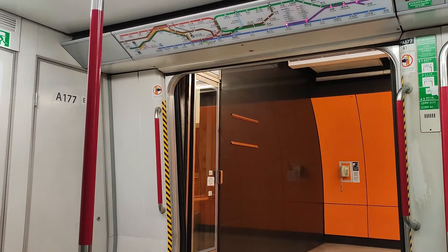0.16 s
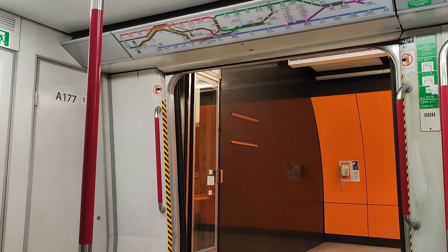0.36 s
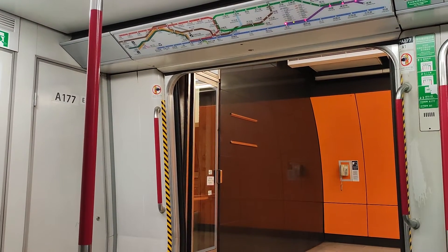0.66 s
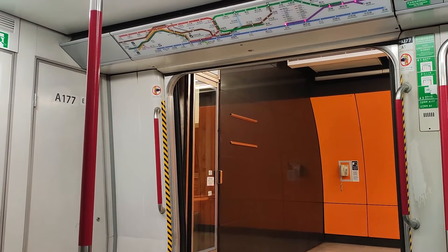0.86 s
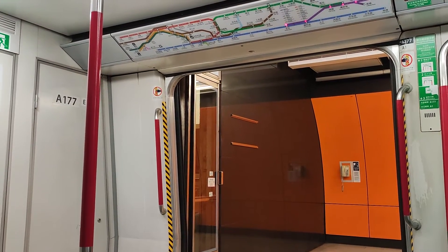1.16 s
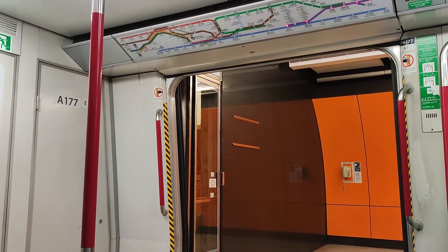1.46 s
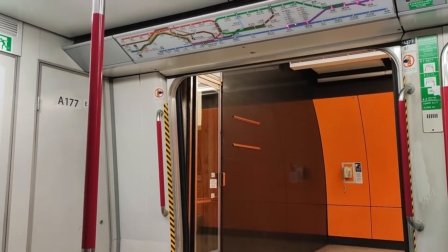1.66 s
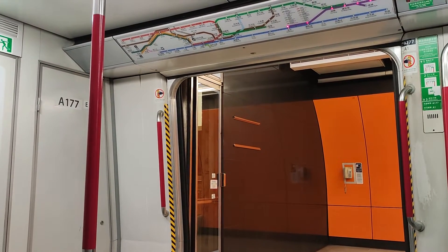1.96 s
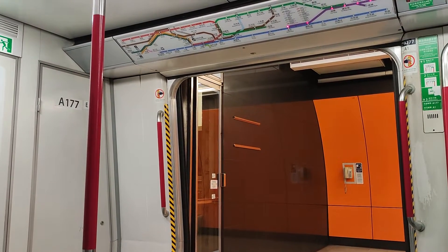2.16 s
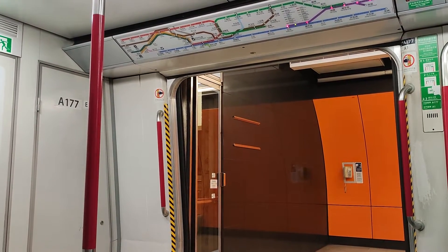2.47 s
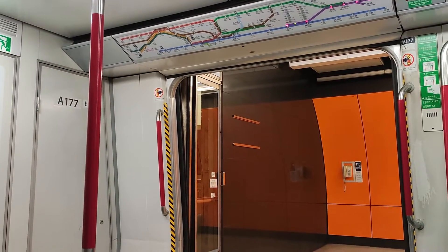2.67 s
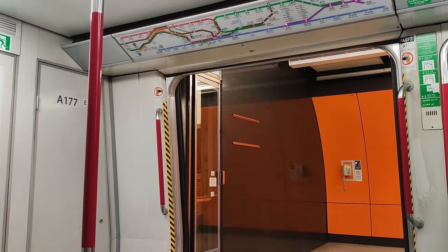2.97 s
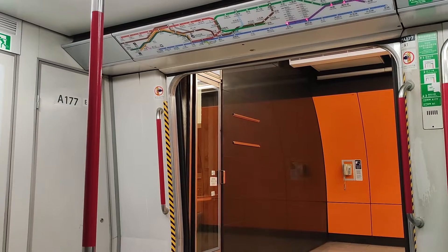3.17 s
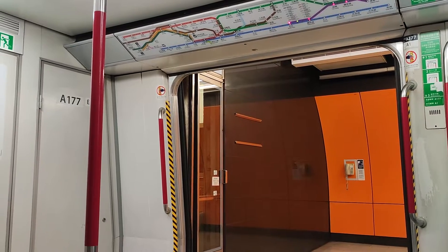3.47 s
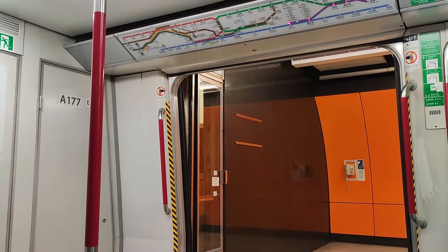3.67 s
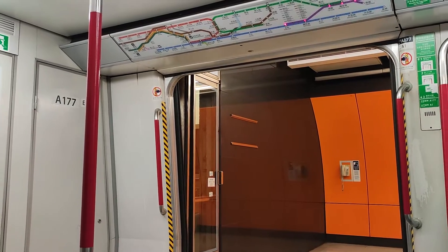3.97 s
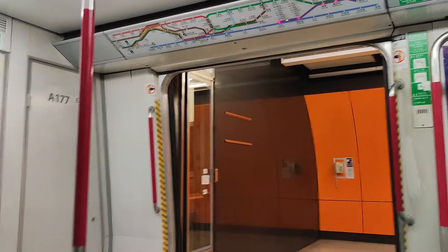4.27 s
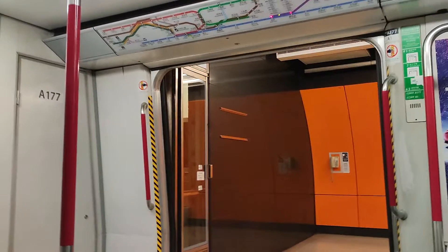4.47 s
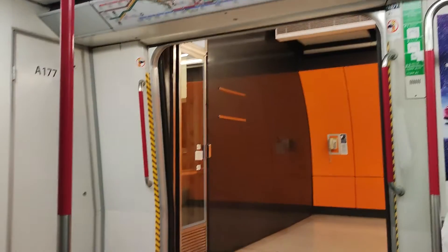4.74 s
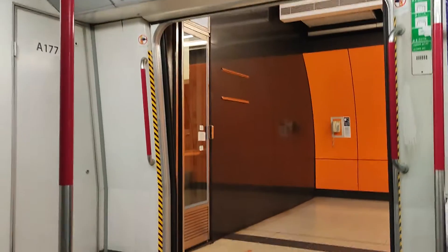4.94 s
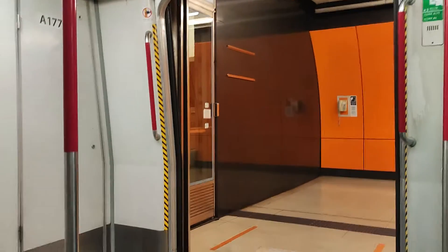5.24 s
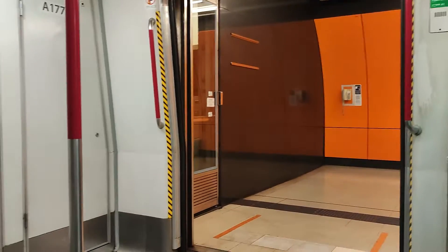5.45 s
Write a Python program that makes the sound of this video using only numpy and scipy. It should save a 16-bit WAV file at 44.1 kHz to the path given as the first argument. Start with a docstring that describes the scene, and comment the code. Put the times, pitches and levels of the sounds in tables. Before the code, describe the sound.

Machinery hums and air vents rush steadily inside a stationary metro carriage, the low hum swelling and easing, with a few faint finger ticks.

```python
"""Metro carriage, doors open

At a platform, a compressor turning 29.5 times a second hums through the body, its strongest orders
swelling and easing as they beat against a twin machine, over a duct rumble and the steady rush of
the air vents. Fingers tick, tap and rub on the hand-held camera, and as it turns the vent hiss
dulls and moves from the left towards the centre."""
import sys
import numpy as np
from scipy import signal
from scipy.fft import rfft, irfft, next_fast_len
from scipy.io import wavfile
from scipy.ndimage import uniform_filter1d, map_coordinates

SR = 44100
rng = np.random.default_rng(int(sys.argv[2]) if len(sys.argv) > 2 else 0)


def waveform_to_disk(signal):
    """Save audio, clipped to [-1, 1], as 16-bit WAV at the path in sys.argv[1]."""
    frames = np.transpose(np.atleast_2d(signal))
    scaled = np.clip(frames, -1, 1) * 32767
    samples = np.round(scaled).astype(np.int16)
    wavfile.write(sys.argv[1], SR, samples)


N = 247401
TIME = np.arange(N) / SR


def amp(db):
    """Decibels to gain."""
    return 10 ** (np.asarray(db) / 20)


def unit(x):
    """Scale to rms 1."""
    return x / np.sqrt(np.mean(x ** 2) + 1e-20)


def along(points, hz):
    """Read (frequency [Hz], value) points on a log axis."""
    freqs, values = np.transpose(points)
    return np.interp(np.log(hz + 1), np.log(freqs + 1), values)


def fader(points):
    """Gain at each sample from (time [s], level [dB]) points."""
    return amp(np.interp(TIME, *np.transpose(points)))


def wobble(rate):
    """A smooth random curve, rate knots a second."""
    knots = rng.standard_normal(int(N * rate / SR) + 4)
    return map_coordinates(knots, [TIME * rate])


def filtered(x, response):
    """Filter x by a gain given as a function of frequency."""
    size = next_fast_len(N + SR // 2)
    return irfft(rfft(x, size) * response(np.fft.rfftfreq(size, 1 / SR)), size)[..., :N]


def eq(x, curve):
    """Shape x with a (frequency [Hz], gain [dB]) curve."""
    return filtered(x, lambda hz: amp(along(curve, hz)))


def pan(lean_db):
    """Left and right gains from left minus right; the nearer side keeps full level."""
    return amp(np.minimum([[lean_db], [-lean_db]], 0))


def camera_turn(before, after, start_s=4.11, takes_s=0.57):
    """Crossfade from before to after as the camera turns."""
    done = np.clip((TIME - start_s) / takes_s, 0, 1)
    return (1 - done) * before + done * after


# Stereo image, tight bass and wide treble: (frequency [Hz], left-right likeness [0-1])
LIKENESS = [(60, 0.96), (200, 1), (380, 0.84), (700, 0.57), (1200, 0), (2400, 0)]

def width(hz):
    """Mid-side angle in radians: 0 is mono, pi / 4 fully diffuse."""
    return np.arccos(np.clip(along(LIKENESS, hz), -1, 1)) / 2


SHAFT_HZ = 29.5

def shaft_tone(shaft_angle, order, waver_db, swell=1):
    """One multiple of the shaft rate; higher ones waver more on their way through the carriage."""
    blur = .08 * np.sqrt(order) * wobble(4)
    phase = order * shaft_angle + rng.uniform(0, 2 * np.pi) + blur + np.angle(swell)
    side = np.where(order < 9, 1, rng.choice([-1, 1]))  # low orders lead on the left
    apart = side * width(order * SHAFT_HZ)
    waver = amp(waver_db * wobble(4.27))
    return np.abs(swell) * unit(waver * np.sin([phase + apart, phase - apart]))


# Fader rides for the sub throb, the deep drone and the burr: (time [s], level [dB])
THROB_RIDE = [(0, -22.5), (.22, -34), (.6, -21), (1.1, -30), (1.35, -24.5), (1.75, -38), (2.15, -22),
              (2.6, -31), (2.9, -25.5), (4.5, -27), (4.8, -35), (5.4, -27.5)]
DRONE_RIDE = [(0, -26), (.65, -23.5), (1, -29), (1.5, -23), (1.75, -27), (2.05, -21), (2.7, -28),
              (3.5, -26.5), (3.85, -26), (5.1, -29), (5.55, -24.5)]
BURR_RIDE = [(0, -38), (.7, -38), (1.3, -28), (1.9, -25), (2.6, -27), (3.4, -32.5), (3.85, -31), (4.6, -32),
             (5.25, -27.5), (5.61, -32)]
# The pulsing heart of the hum, sounded by both machines: (order [x shaft rate], level [dB],
# twin against it [dB], time of a lull [s], change with the camera's turn [dB])
BEATING_ORDERS = [(7, -25.3, -2, 1.28, 2), (8, -28.6, -17, 1.25, 0.5), (10, -33, -13, 0.7, -4),
                  (12, -39, -11, 1.9, 3.5), (14, -42.5, -5.5, 2.15, 5.5)]
# The even whine on top: (order [x shaft rate], left before trim [dB], right before trim [dB])
STEADY_ORDERS = [(6, -42, -42), (9, -44, -44), (11, -43, -48), (15, -41, -44.5), (17, -40.5, -38),
                 (19, -45, -44), (20, -39.5, -38), (21, -39, -40), (23, -41, -45.5), (24, -48, -42),
                 (25, -47, -42), (29, -37, -43.5), (35, -47, -40.5)]

def compressor(drift_hz=.015, slip_hz=0.0382, whine_trim_db=-0.3):
    """Hum of one shaft; a twin runs slip_hz faster, so order k beats at k times that rate."""
    angle = 2 * np.pi * np.cumsum(SHAFT_HZ + drift_hz * wobble(2.15)) / SR
    hum = fader(THROB_RIDE) * shaft_tone(angle, order=1, waver_db=1.2)
    hum += fader(DRONE_RIDE) * shaft_tone(angle, order=2, waver_db=0.5)
    hum += fader(BURR_RIDE) * shaft_tone(angle, order=5, waver_db=1.1)
    for order, db, twin_db, lull_s, turn_db in BEATING_ORDERS:
        slip_angle = 2 * np.pi * order * slip_hz * (TIME - lull_s)
        beat = 1 - amp(twin_db) * np.exp(1j * slip_angle)  # the two oppose each other at the lull
        hum += amp(db + camera_turn(0, turn_db)) * shaft_tone(angle, order, waver_db=0.5, swell=beat)
    whine = sum(amp([[left], [right]]) * shaft_tone(angle, order, waver_db=2)
                for order, left, right in STEADY_ORDERS)
    return hum + amp(whine_trim_db) * whine


# Balance of the moving air: (frequency [Hz], left minus right [dB])
AIR_LEAN = [(60, 0.5), (150, 0.5), (600, 0.3), (1300, 2.5), (2300, 2), (4400, -0.5), (6500, 3)]

def airflow(spectrum, eddy_db=0.55):
    """Turbulent stereo noise: eddies ripple its level in small patches of pitch and time."""
    bands = signal.stft(rng.standard_normal((2, N)), nperseg=512)[2]
    eddies = uniform_filter1d(rng.standard_normal(bands.shape[1:]), size=8, axis=0)
    eddies = uniform_filter1d(eddies, size=20, axis=1)
    bands *= amp(eddy_db * unit(eddies))
    noise = signal.istft(bands, nperseg=512)[1][:, :N] * np.sqrt(SR / 2)  # 0 dB per Hz
    mid_side_gains = lambda hz: amp(along(spectrum, hz)) * [np.cos(width(hz)), np.sin(width(hz))]
    mid, side = filtered(noise, mid_side_gains)
    stereo = np.array([mid + side, mid - side])
    return filtered(stereo, lambda hz: amp(np.outer([.5, -.5], along(AIR_LEAN, hz))))


# The air's low resonance in the carriage, before its fader: (frequency [Hz], density [dB per Hz])
BOOM_SPECTRUM = [(70, -71), (98, -47.5), (117, -35.5), (130, -43), (145, -56), (200, -116.5)]
# One swell, then a slow ease: (time [s], gain [dB])
BOOM_RIDE = [(0, -5.5), (1.1, 2.4), (2, -5), (2.8, -4.5), (5.61, -8.5)]

def carriage_boom():
    """The air in the carriage resonates in a narrow band near 117 Hz."""
    return fader(BOOM_RIDE) * airflow(BOOM_SPECTRUM)


# The vents' body, hissing top and fine fizz, before panning: (frequency [Hz], density [dB per Hz])
RUSH_SPECTRUM = [(150, -64), (330, -55.5), (460, -50.5), (550, -54), (750, -51), (920, -55.5), (1300, -54),
                 (2600, -62), (3700, -64.5), (4400, -69), (5000, -67.5), (5800, -72), (6900, -72),
                 (8800, -115)]
HISS_SPECTRUM = [(5800, -110), (6700, -79), (7400, -73), (8000, -69.5), (8450, -79.5), (8950, -100),
                 (9500, -125)]
FIZZ_SPECTRUM = [(8600, -115), (9300, -85), (10300, -85), (11500, -82.5), (13800, -83), (15000, -86),
                 (15600, -112)]
# The darker tone of the rush after the turn: (frequency [Hz], gain [dB])
TURNED_EQ = [(200, 10.5), (450, -0.5), (750, 0.7), (1500, -0.8), (3500, -1), (5000, -3), (6500, -5.5)]

def vents(shift_right_db=0.7):
    """Air rushes from the vents; the directional treble follows the camera's turn."""
    rush = airflow(RUSH_SPECTRUM)
    turned_rush = amp([[-shift_right_db], [shift_right_db]]) * eq(rush, TURNED_EQ)
    hiss = airflow(HISS_SPECTRUM) * camera_turn(amp([[0], [-28]]), amp([[-3.5], [-17]]))
    flutter = amp(.5 * wobble(7))
    fizz = flutter * airflow(FIZZ_SPECTRUM) * camera_turn(amp([[0], [-16.5]]), amp([[-6], [-4.5]]))
    return camera_turn(rush, turned_rush) + hiss + fizz


# The low bed under the vents: (frequency [Hz], density [dB per Hz])
RUMBLE_SPECTRUM = [(3, -68), (12, -47), (19, -46), (26, -48), (33, -58), (43, -46), (52, -55), (75, -47.5),
                   (120, -46.5), (160, -47), (190, -48), (235, -47), (330, -50), (500, -71), (1200, -100)]

def duct_rumble():
    """Air moving through the ducts rumbles steadily."""
    return airflow(RUMBLE_SPECTRUM)


# Finger cues on the case: (time [s], strength before EQ [dB], left minus right [dB],
# 60 dB decay [s], knock send [dB], low cut [Hz])
TICK_CUES = [(.037, -9, 24, .006, -18, 10500), (.046, -14, 24, .012, -17, 11000),
             (.0505, -3.5, 26, .007, -10, 6500), (4.183, -23, 12, .06, -12, 8000),
             (4.2048, -3, 26, .004, -5, 7300), (4.454, -12.5, -1, .018, -2, 7000),
             (4.457, -19, -5, .013, 12.5, 6000), (4.722, -5.5, -18, .004, -30, 10600)]
# A tick's dry top and its knock in the case: (frequency [Hz], gain [dB])
TICK_EQ = [(4000, -30), (6500, -9), (8000, 1), (10000, -5), (12000, -0.5), (15500, -0.5)]
KNOCK_EQ = [(1200, -18), (2500, 1), (3800, 5), (5100, 7), (7300, -1), (9000, -31)]

def finger_ticks():
    """The grip shifts: skin lets go with a snap, chatters briefly and knocks the camera's case."""
    ticks, knocks = np.zeros((2, 2, N))
    for start_s, db, lean_db, t60, knock_db, low_cut_hz in TICK_CUES:
        snap = np.arange(N) == round(start_s * SR)
        decay = (TIME >= start_s) * amp(-60 * np.maximum(TIME - start_s, 0) / t60)
        chatter = decay * rng.standard_normal((2, N))
        touch = amp(db) * pan(lean_db) * (snap + 0.46 * chatter)
        ticks += filtered(touch, lambda hz: 1 - 1 / (1 + (hz / low_cut_hz) ** 20))
        knocks += amp(knock_db) * touch
    return eq(ticks, TICK_EQ) + eq(knocks, KNOCK_EQ)


# The tap's dull, mid-heavy tone: (frequency [Hz], gain [dB])
TAP_EQ = [(150, -10), (400, 0), (900, 13), (1700, 16.5), (3000, 9.5), (4000, 1), (6000, -15), (9000, -50)]

def finger_tap(at_s=4.1981):
    """A fingertip lands on the right microphone port: one dull pulse with no ring."""
    push = np.arange(N) == round(at_s * SR)
    return pan(lean_db=-26) * eq(push, TAP_EQ)


# The airy whisper of sliding skin: (frequency [Hz], relative level [dB])
RUB_EQ = [(9000, -15), (11500, -4), (13000, 4), (14200, -4), (15500, -14)]

def finger_rub(peak_s=4.315, peak_db=-39, rise_db_per_s=110, fall_db_per_s=170):
    """A fingertip slides by the left port: friction noise that swells and drops away."""
    stroke_db = peak_db - np.maximum(rise_db_per_s * (peak_s - TIME), fall_db_per_s * (TIME - peak_s))
    friction = unit(eq(rng.standard_normal((2, N)), RUB_EQ))
    return pan(lean_db=17) * amp(stroke_db) * friction


def scene(left_lead_s=.00012):
    """Machine hum and moving air, reaching the left port first, and the hand on the camera."""
    bed = compressor() + carriage_boom() + vents() + duct_rumble()
    bed = filtered(bed, lambda hz: np.exp(1j * np.pi * left_lead_s * np.outer([1, -1], hz)))
    return bed + finger_ticks() + finger_tap() + finger_rub()


def record(dry):
    """The camera keeps nothing above its band limit."""
    return filtered(dry, lambda hz: hz < 15850)


dry = scene()
out = record(dry)
waveform_to_disk(out)
```